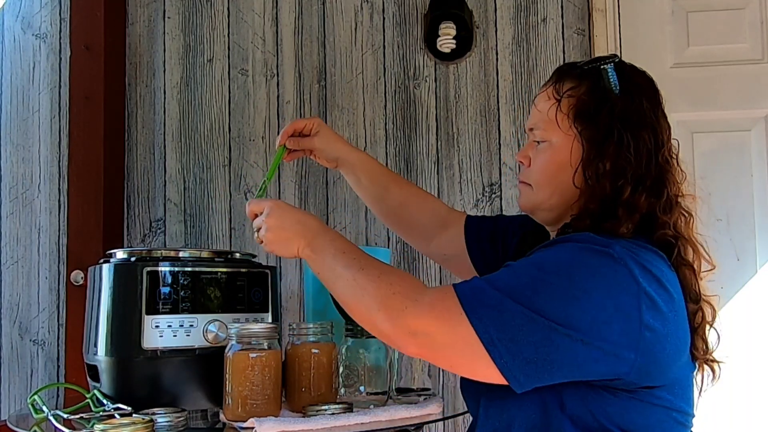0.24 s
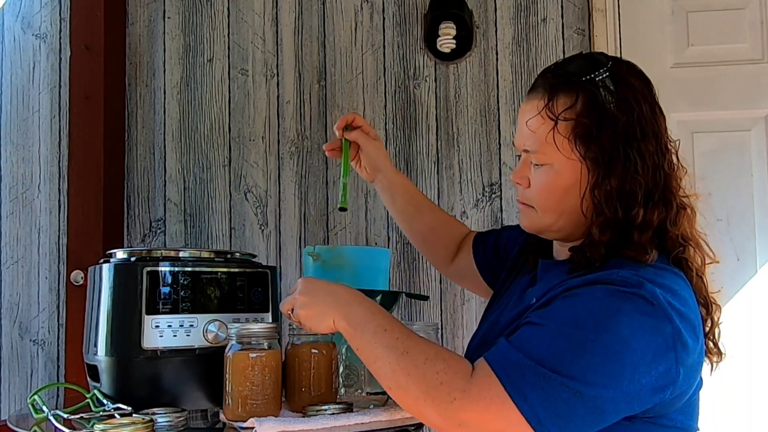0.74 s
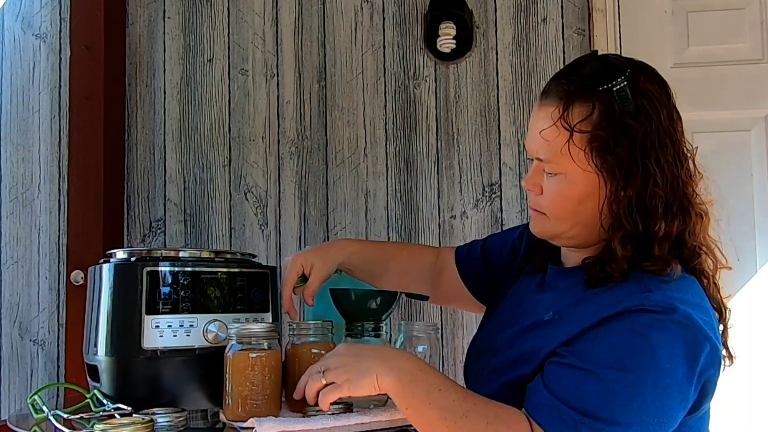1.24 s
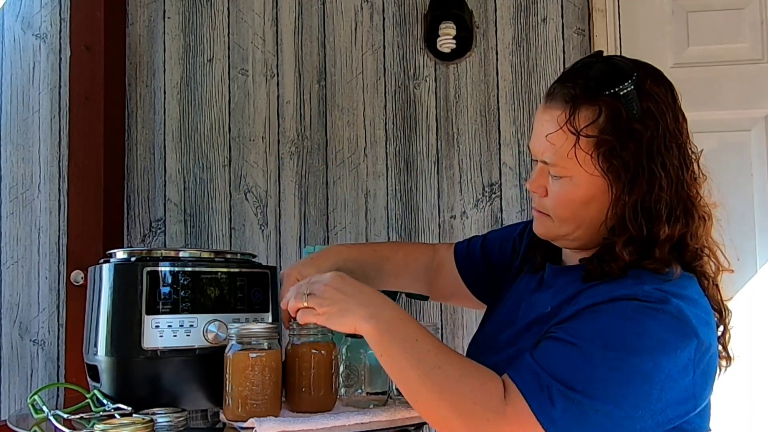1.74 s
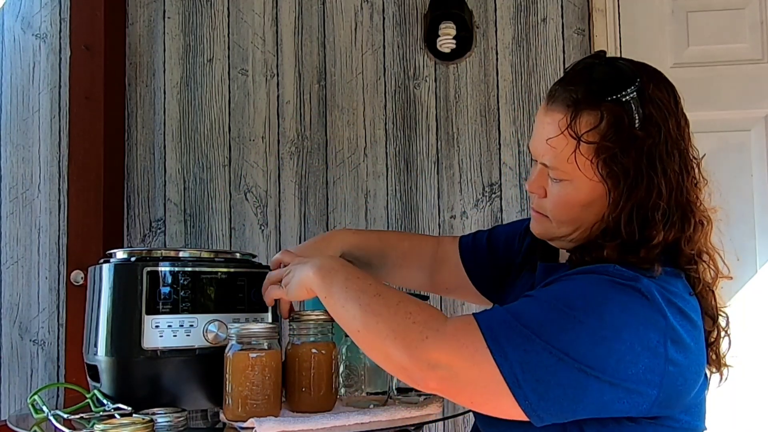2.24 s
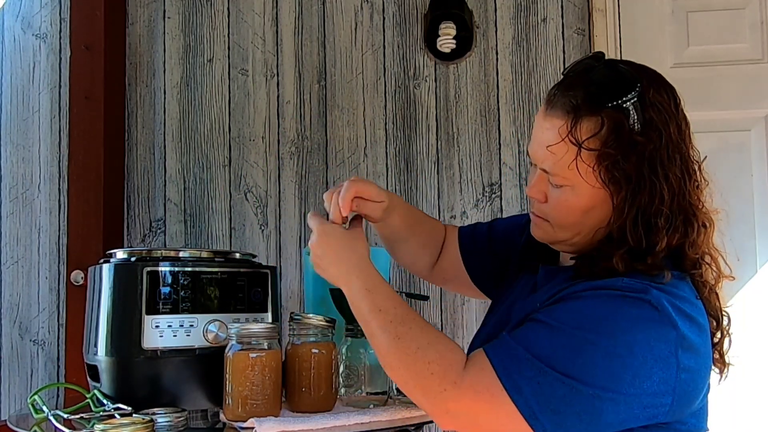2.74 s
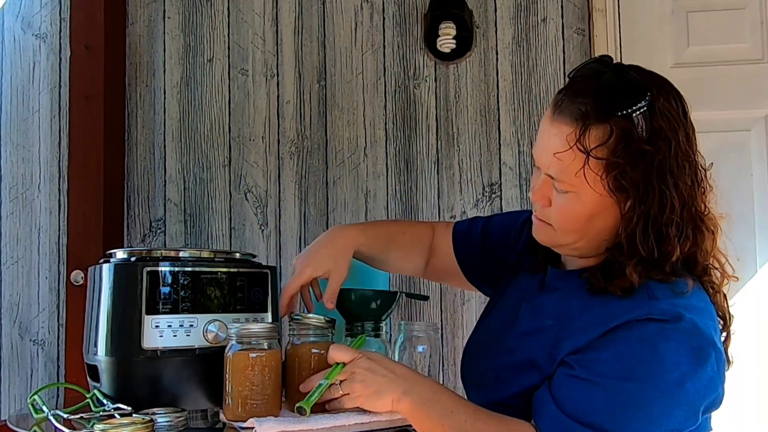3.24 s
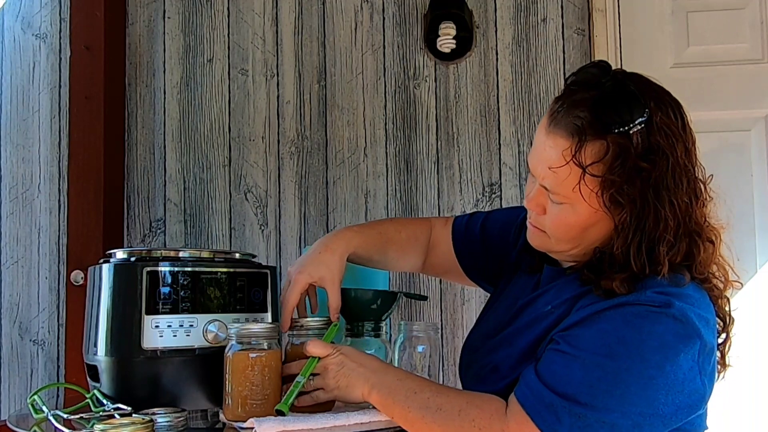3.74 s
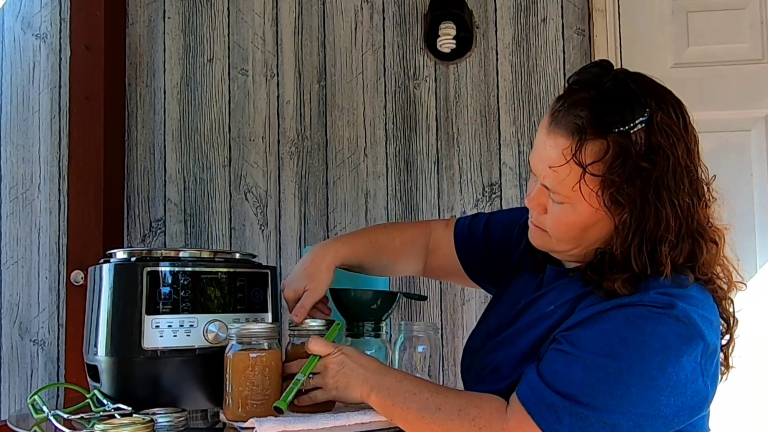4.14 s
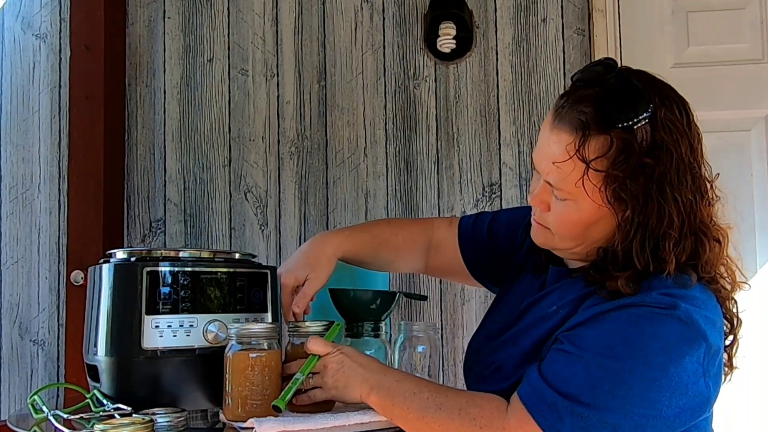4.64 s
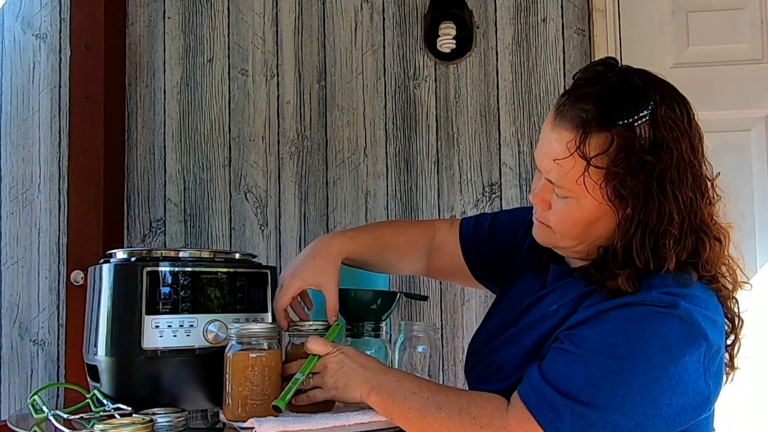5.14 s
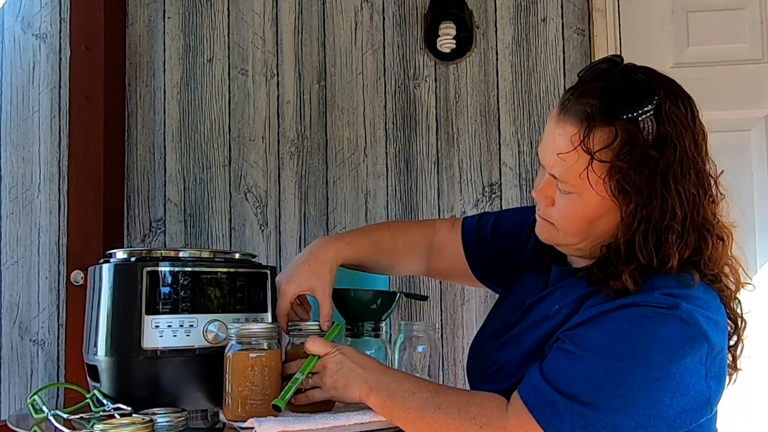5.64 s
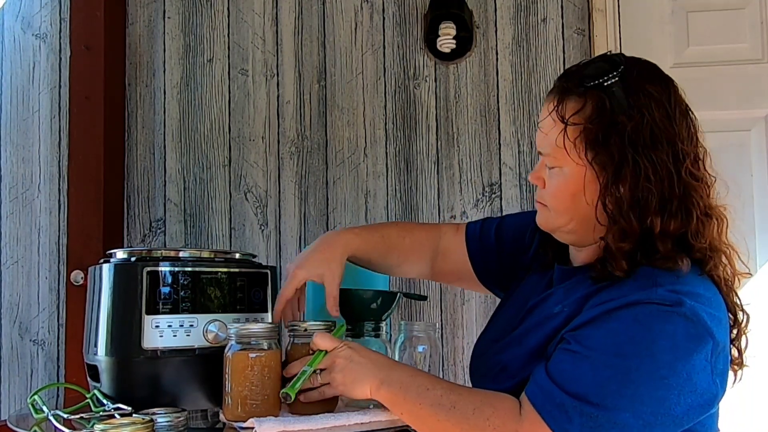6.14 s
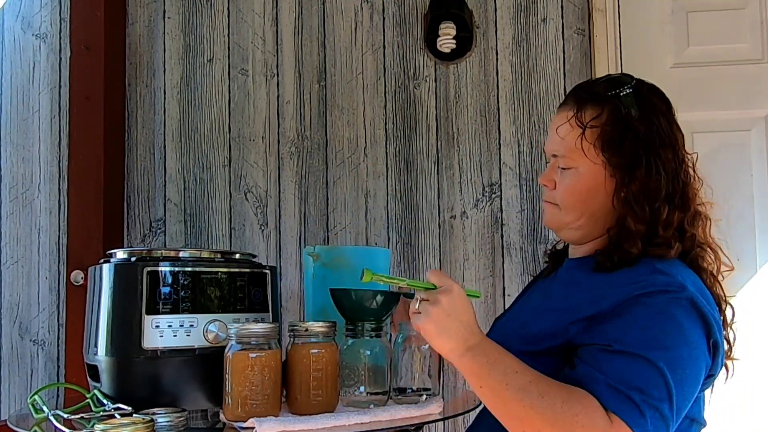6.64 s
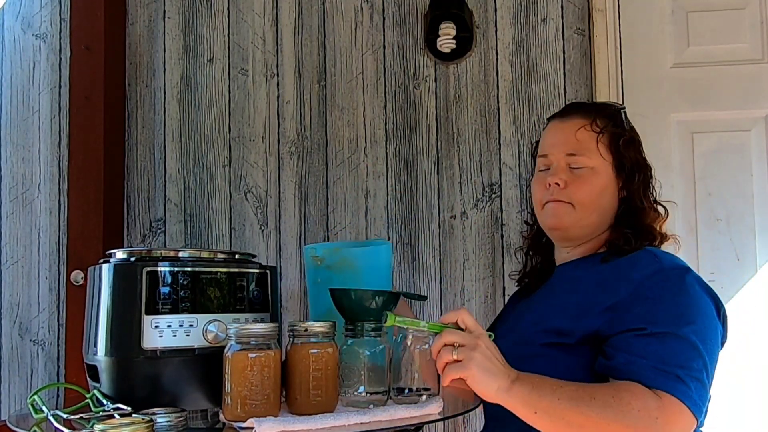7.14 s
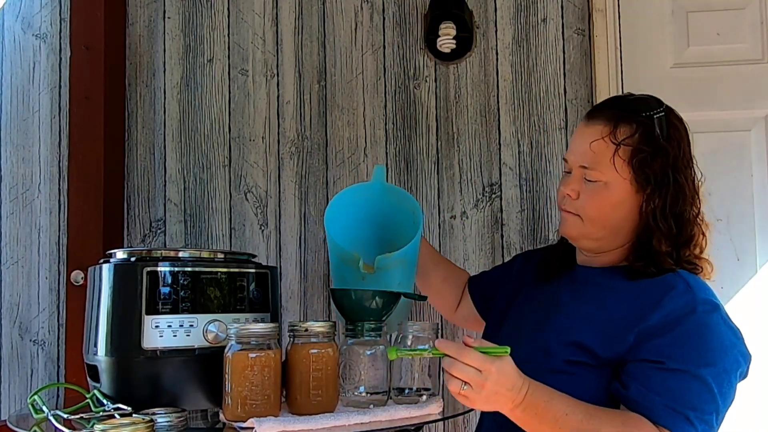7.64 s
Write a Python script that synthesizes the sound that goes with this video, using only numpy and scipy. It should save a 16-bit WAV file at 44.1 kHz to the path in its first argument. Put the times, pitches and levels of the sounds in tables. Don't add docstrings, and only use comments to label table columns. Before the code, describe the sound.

Someone caps glass jars at an outdoor table, heard close. Light plastic taps build to a very loud jar knock, a bird whistling quickly alongside and adding two nasal notes. A lid clanks and bounces with a heavy wooden thud. After a pause, gritty ticking bands twist down, then fade into faint rubbing, light lid touches, insect buzz, wind puffs and renewed whistles.

```python
import sys
import numpy as np
from scipy import signal
from scipy.fft import rfft, irfft, next_fast_len
from scipy.io import wavfile
from scipy.ndimage import uniform_filter1d, map_coordinates

SR = 44100
rng = np.random.default_rng(int(sys.argv[2]) if len(sys.argv) > 2 else 0)


def persist_wave(psi):
    counts = np.round(np.clip(psi, -1, 1) * 32767).astype(np.int16)
    wavfile.write(sys.argv[1], SR, np.atleast_2d(counts).T)


def natural_amplitude(level_db):
    exponent = np.asarray(level_db, float) / 20
    return 10 ** exponent


N = 347949


def rms_one(x):
    return x / np.sqrt(np.mean(x ** 2) + 1e-20)


def at_hz(points, hz):
    return np.interp(np.log(hz + 1), np.log(np.array(points)[:, 0]), np.array(points)[:, 1])


def in_time(rows):
    return np.interp(np.arange(N) / SR, *np.transpose(rows))


def colour(x, spectrum):
    size = next_fast_len(N)
    gain = natural_amplitude(at_hz(spectrum, np.fft.rfftfreq(size, 1 / SR)))
    return irfft(rfft(x, size) * gain, size)[..., :N]


def band(x, low_hz, high_hz):
    return signal.sosfilt(signal.butter(2, [low_hz, high_hz], "band", fs=SR, output="sos"), x)


def highpass(x, hz):
    return signal.sosfilt(signal.butter(2, hz, "high", fs=SR, output="sos"), x)


def drift(rate):
    steps = rng.standard_normal(int(N / SR * 2 * rate) + 3)
    return map_coordinates(steps, [np.arange(N) / SR * 2 * rate], order=3)


def turns(hz):
    return 2 * np.pi * np.cumsum(hz) / SR


def resonate(x, hz, width_hz):
    r = np.exp(-np.pi * width_hz / SR)
    poles = [1, -2 * r * np.cos(2 * np.pi * hz / SR), r * r]
    return signal.lfilter([(1 - r * r) / 2, 0, (r * r - 1) / 2], poles, x)


def place(x, pan_db, lag):
    left = np.interp(np.arange(N) - lag, np.arange(N), x)
    return np.array([left * natural_amplitude(pan_db / 2), x * natural_amplitude(-pan_db / 2)])


def echoes(x, t60, first_s):
    t = np.arange(round(0.5 * SR)) / SR
    tail = rng.standard_normal((2, len(t))) * natural_amplitude(-60 * t / t60) * np.clip(t / first_s, 0, 1)
    tail = tail / np.sqrt(np.sum(tail ** 2, axis=1, keepdims=True))
    return signal.fftconvolve(x[None], tail, axes=1)[:, :N]


def calls(rows):
    rows, t = np.array(rows), np.arange(N) / SR
    row = rows[np.maximum(np.searchsorted(rows[:, 0], t) - 1, 0)].T
    progress = (t - row[0]) / row[1]
    return np.clip(progress, 0, 1), (progress > 0) & (progress < 1), *row[1:]


# f/Hz, level/dB per Hz
CRACK_COLOUR = [(120, -75), (200, -54), (783, 11), (1070, -75), (1260, -23), (2250, -13), (4580, -19.5),
                (10200, -14.5), (15500, -148)]


def knocks(hits, modes, longest_s, pan_db=2.5, push=0.43, bright_db=0.0):
    out, t = np.zeros((2, N)), np.arange(round(0.3 * SR)) / SR
    white = highpass(rng.standard_normal(SR), 0.81 * modes[0][0])
    crack_noise = 0
    for k, (hz, db, _) in enumerate(modes):
        crack_noise = crack_noise + natural_amplitude(0.82 * db) * resonate(white, hz, 344) * (-1) ** k
    crack_noise = rms_one(crack_noise)
    bright = rms_one(colour(white, CRACK_COLOUR)[:SR])
    for s, peak_db, contact_s, crack_db in hits:
        bounces = rng.random(len(t)) < 0.05
        rattle = 0.69 * rng.standard_normal(len(t)) * bounces * np.exp(-(t / contact_s) ** 2)
        rattle[0] = push
        rings = np.zeros(len(t))
        for hz, db, t60 in modes:
            t60 = min(t60, longest_s * (800 / hz) ** 0.14)
            pair = np.sin(2 * np.pi * hz * t) + 0.063 * np.sin(2 * np.pi * 1.3 * hz * t)
            rings += natural_amplitude(db + 2.0 * rng.standard_normal() - 60 * t / t60) * pair
        body = signal.fftconvolve(rattle, rings)[:len(t)]
        i = round(s * SR)
        fresh = slice(i % (SR // 2), i % (SR // 2) + len(t))
        crack = crack_noise[fresh] + natural_amplitude(peak_db + bright_db) * bright[fresh]
        crack = natural_amplitude(crack_db) * crack * np.exp(-t / (0.0029 + 1.08 * contact_s))
        sides = natural_amplitude(pan_db / 2 * np.array([[1], [-1]]))
        out[:, i:i + len(t)] += natural_amplitude(peak_db) * (body / np.abs(body).max() + crack) * sides
    return out


# t/s, level/dB, contact/s, crack/dB
JAR_HITS = [
    (1.024, -1, 0.015, -8),
    (1.062, -48, 0.0087, -17),
]
# f/Hz, level/dB, t60/s
JAR_MODES = [(480, -31, 0.073), (684, -2, 0.12), (800, 13.5, 0.062), (1196, -3, 0.09), (1340, 2.5, 0.07),
             (2685, 7, 0.08), (3086, 9, 0.1), (3570, 2, .1), (4480, 9, 0.07), (4740, -4, .09),
             (1890, -35, .05), (2270, -34, 0.058), (6970, -32, 0.051), (9000, -27, 0.071)]


def jar():
    return knocks(JAR_HITS, JAR_MODES, longest_s=0.069, push=2.3)


# t/s, level/dB, contact/s, crack/dB
JUG_HITS = [
    (.837, -11.5, 0.0096, -5),
    (.85, -37, 0.0087, -19),
]
# f/Hz, level/dB, t60/s
JUG_MODES = [(765, -19, 0.05), (1212, 3.5, 0.14), (1580, 3.5, 0.06), (2500, 1, 0.065), (2800, 8, 0.055),
             (3020, 5.5, 0.06), (3500, -4, 0.045), (3880, 0.5, 0.03), (4880, 2, 0.024)]


def jug():
    return knocks(JUG_HITS, JUG_MODES, longest_s=0.17, pan_db=4.5)


# t/s, level/dB, contact/s, crack/dB
LID_DROPS = [
    (2.29, -12.5, 0.024, -10),
    (2.458, -39, 0.011, 7.5),
]
# t/s, level/dB, contact/s, crack/dB
KNUCKLE_TOUCHES = [
    (7.008, -44, 0.0056, 5.2),
    (7.097, -39.5, 0.009, 4),
    (7.272, -39.5, 0.016, 0.9),
]
# f/Hz, level/dB, t60/s
LID_MODES = [(603, 6.5, 0.059), (820, 7, 0.035), (1226, 3, 0.22), (1560, -15, 0.036), (1700, -10.5, .05),
             (2480, 3.5, 0.037), (2730, 5, 0.044), (3040, 0, 0.05), (3580, -9, .04), (4270, -8, .03),
             (4540, -17, 0.03), (5200, -11, .03), (6260, -12, .03)]


def lids():
    drops = knocks(LID_DROPS, LID_MODES, longest_s=0.27, push=2.2, bright_db=3.5)
    return drops + knocks(KNUCKLE_TOUCHES, LID_MODES, longest_s=0.017)


# t/s, level/dB, contact/s, crack/dB
TABLE_HITS = [
    (2.49, -6, 0.01, -8),
    (2.508, -15, 0.0013, -25),
]
# t/s, level/dB, contact/s, crack/dB
SOFT_BOUNCES = [
    (2.415, -34, 0.0098, -10),
    (2.591, -22, 0.018, -11),
]
# f/Hz, level/dB, t60/s
TABLE_MODES = [(406, 6, 0.057), (475, -1, 0.15), (555, 10, 0.1), (783, 13.5, .12), (1192, 0.5, 0.065),
               (1254, 1, .07), (1927, -9.5, 0.033), (3200, -6.5, .08), (3590, -9, 0.08), (4250, -16, .04),
               (5110, -8.5, 0.06), (1660, -26, .05), (2400, -34, 0.034)]


def table_top():
    blows = knocks(TABLE_HITS, TABLE_MODES, longest_s=0.086, push=1.6, bright_db=-5.0)
    return blows + knocks(SOFT_BOUNCES, TABLE_MODES[:5], longest_s=0.058, bright_db=7)


# t/s, level/dB, contact/s, crack/dB
WAND_HITS = [
    (.385, -22, 0.013, -2.5),
    (.419, -38, 0.0071, -4),
    (1.55, -36, 0.048, -9),
]
# f/Hz, level/dB, t60/s
WAND_MODES = [(1346, 6.9, 0.12), (1720, 1.5, 0.12), (2290, 1.3, 0.1), (2770, 6.5, 0.13), (3200, 0.1, 0.042),
              (4000, 0.097, 0.04), (3820, 1.4, 0.014), (4900, 1.2, 0.059)]


def wand():
    return knocks(WAND_HITS, WAND_MODES, longest_s=0.14)


# t/s, level/dB, contact/s, crack/dB
FUNNEL_HITS = [
    (.912, -28.5, 0.054, -4.5),
    (.953, -12, 0.022, -10),
    (.975, -21, 0.024, -18),
    (1.001, -14.5, 0.02, -13),
]
# f/Hz, level/dB, t60/s
FUNNEL_MODES = [(751, -7.5, 0.09), (1233, 4.5, 0.2), (1340, 5, 0.12), (2100, -8.5, .06),
                (2710, -5.5, 0.055), (3500, -7, 0.055), (3900, -9, 0.042), (4900, -8.5, 0.063)]


def funnel():
    return knocks(FUNNEL_HITS, FUNNEL_MODES, longest_s=0.14, bright_db=-22)


# t/s, level/dB, t60/s
BOOMS = [
    (2.296, -28, 0.55),
    (2.334, -52, 0.18),
    (2.408, -34, 0.083),
    (2.459, -25, 0.092),
    (2.495, -39, 0.29),
    (2.6, -45.5, 0.73),
]


def board():
    t = np.arange(N) / SR
    shudder = rms_one(resonate(band(rng.standard_normal(N), 155, 470), 188, 57))
    swells = sum(np.clip((t - s) / 0.022, 0, 1) * natural_amplitude(db - 60 * np.abs(t - s) / t60) for s, db, t60 in BOOMS)
    return shudder * swells


# f/Hz, width/Hz, level/dB
THREAD_MODES = [(700, 33, 9), (1400, 20, -5), (1840, 54, -5.5), (431, 235, 16), (875, 240, 14.5),
                (1286, 62, 10.5), (1990, 260, 5), (2500, 54, 10.5), (2864, 320, 3.5), (2980, 29, -58),
                (3510, 210, 7.5), (4380, 250, 9), (4650, 23, -23), (4960, 7.3, -12), (5500, 210, -41)]
# f/Hz, level/dB per Hz
RASP_COLOUR = [(88, -57), (150, 14.5), (436, -24), (844, 5), (966, -2.5), (1320, 2), (2410, -25),
               (2980, -5), (9360, -9), (11200, -24), (14200, -47), (15600, -45)]


def scraping():
    low, middle, high = pressure()
    sizes = natural_amplitude(4 * np.minimum(rng.exponential(1, N), 3.5)) * rng.choice([-1, 1], N)
    grit = (rng.random(N) < 5000 / SR) * sizes * natural_amplitude(1.8 * drift(80))
    rings = 0
    for k, (hz, width, db) in enumerate(THREAD_MODES):
        rings = rings + natural_amplitude(db) * resonate(grit, hz, width) * (-1) ** k
    rub = rms_one(colour(grit, RASP_COLOUR)) + 1.1 * rms_one(rings)
    body, rasp = rms_one(band(rub, 166, 780)), rms_one(band(rub, 1190, 3660))
    hiss = rms_one(band(rub, 4450, 6040)) + 0.72 * rms_one(highpass(rub, 6500))
    air = rms_one(band(rng.standard_normal(N), 8100, 17000))
    out = low * body + middle * rasp + high * natural_amplitude(4.5) * hiss + middle * natural_amplitude(-23.5) * air
    return out + ringing(grit) + catches() + metal_ticks()


# peak t/s, rise/s, fall/s, rasp level/dB, brightness/dB
HAND_STROKES = [(1.942, 0.16, 0.2, -57, 13), (3.3, 0.3, 0.51, -53, -0.5), (3.5, 0.23, 0.13, -51, 6.5),
                (3.677, 0.047, 0.062, -31.5, 2), (3.945, 0.037, 0.056, -30.5, 3),
                (4.15, 0.055, 0.22, -33, 2.5), (4.21, 0.11, 0.18, -30.5, 3), (4.27, 0.15, 0.13, -32, 1),
                (4.542, 0.0057, 0.25, -33.5, -1), (4.584, 0.016, 0.12, -28.5, 0),
                (4.64, 0.006, 0.14, -27.5, 2.5), (4.708, 0.0086, 0.11, -29, -1),
                (4.95, 0.0064, 0.076, -39, -3.5), (5.04, 0.14, 0.15, -31.5, 1),
                (5.365, 0.047, 0.12, -38, 0), (5.405, .04, 0.048, -41.5, -1),
                (5.73, 0.082, 0.092, -48.5, 1), (6.0, 0.12, 0.094, -46.5, 4),
                (6.309, 0.096, 0.14, -52.5, 5), (6.071, 0.11, 0.032, -40, 1.5),
                (7.032, 0.3, 0.067, -49.5, 2.5), (7.2, 0.66, 0.46, -53, 2)]


def pressure():
    range_db, rounding = 43.5, 1.86
    body_db, hiss_db = -2, -10.5
    t, gains = np.arange(N) / SR, np.zeros((3, N))
    for s, rise, fall, db, bright_db in HAND_STROKES:
        away = np.maximum((s - t) / rise, (t - s) / fall)
        swell = natural_amplitude(db - range_db * away ** rounding) * np.clip(4 - 4 * away, 0, 1)
        balance = natural_amplitude(np.array([[body_db - bright_db], [0], [hiss_db + bright_db]]))
        gains = np.maximum(gains, swell * balance)
    return gains


# t/s, level/dB, f/Hz, t60/s
AFTER_RINGS = [(3.676, -28, 2020, .05), (3.94, -31.5, 400, 0.079), (4.25, -28, 824, 0.27),
               (4.285, -36, 3590, .08), (4.54, -40, 1390, .06), (4.548, -26.5, 4070, 0.051),
               (4.582, -21, 1340, 0.065), (4.582, -25, 513, .07), (4.586, -25.5, 3086, 0.17),
               (4.59, -36, 5070, 0.035), (4.637, -25, 3220, .05), (4.645, -30, 3800, .05),
               (4.655, -30, 2840, .1), (4.664, -24, 1340, .05), (4.666, -30, 4080, .04),
               (4.705, -25.5, 2856, 0.087), (4.707, -24, 3710, 0.045), (4.712, -24.5, 600, 0.044),
               (4.73, -30, 1384, .06), (4.74, -41, 3060, .25), (4.949, -29, 1680, 0.044),
               (5.027, -22.5, 2500, 0.044), (5.053, -30, 3500, .03), (5.075, -41, 2940, .04)]
# peak t/s, length/s, f/Hz, width/Hz, level/dB
GAP_HUMS = [(5.01, 0.037, 1600, 140, -36.5), (5.042, 0.046, 1900, 250, -34), (5.057, 0.038, 2100, 230, -50),
            (4.26, 0.16, 785, 39, -40), (7.125, 0.076, 420, 95, -43.5), (3.97, 0.067, 490, 170, -36.5),
            (4.7, .015, 3900, 900, -38.5), (4.612, 0.038, 3300, 450, -48), (4.645, 0.034, 410, 150, -33.5)]


def ringing(grit):
    out, t = np.zeros(N), np.arange(round(0.3 * SR)) / SR
    for s, db, hz, t60 in AFTER_RINGS:
        ring = natural_amplitude(db - 60 * t / t60) * np.clip(t / 0.0012, 0, 1) * np.sin(2 * np.pi * hz * t)
        out[round(s * SR):round(s * SR) + len(t)] += ring
    now = np.arange(N) / SR
    for s, length, hz, width, db in GAP_HUMS:
        out += natural_amplitude(db) * np.exp(-((now - s) / length * 2) ** 2) * rms_one(resonate(grit, hz, width))
    return out * natural_amplitude(2.7 * drift(100))


# t/s, level/dB, f/Hz
THREAD_CATCHES = [(3.674, -25, 790), (3.934, -27, 1990), (3.952, -20, 1280), (4.221, -21, 697),
                  (4.246, -17.5, 834), (4.549, -20, 934), (4.584, -19, 3150), (4.637, -16.5, 431),
                  (4.668, -22, 1290), (4.707, -25, 2850), (4.948, -30, 336), (5.027, -27, 1850),
                  (5.052, -22, 2020), (5.695, -33.5, 726), (5.705, -35, 752), (4.13, -44, 3390),
                  (4.198, -15, 5760), (4.228, -21.5, 852), (4.28, -26.5, 734), (4.54, -26, 1380),
                  (4.599, -20, 1090), (4.655, -22, 512), (4.731, -29, 800), (4.996, -27, 1490),
                  (5.065, -35, 1740), (5.078, -35, 2400), (5.364, -33, 740), (5.4, -34, 700)]


def catches():
    out, t = np.zeros(N), np.arange(2000) / SR
    for s, db, hz in THREAD_CATCHES:
        tick = 0.5 * rng.standard_normal(len(t)) * np.exp(-t / 0.0009)
        ring = np.sin(2 * np.pi * hz * t) * np.exp(-t / 0.008 * (hz / 800) ** 0.9)
        out[round(s * SR):round(s * SR) + len(t)] += natural_amplitude(db - 1.0) * band(tick + ring, 130, 6600)
    return out


# t/s, level/dB
METAL_TICKS = [(3.678, -9), (3.935, -9), (4.1984, -30), (4.583, -21), (4.6015, -28), (4.551, -30),
               (4.637, -16), (4.706, -18), (4.948, -33), (4.731, -27), (5.029, -26), (5.057, -18),
               (7.0994, -46)]


def metal_ticks():
    out, t = np.zeros(N), np.arange(2000) / SR
    for s, db in METAL_TICKS:
        burst = band(rng.standard_normal(len(t)) * np.exp(-t / 0.0021), 1700, 9300)
        out[round(s * SR):round(s * SR) + len(t)] += natural_amplitude(db - 13.0) * burst
    return out


# t/s, length/s, top f/Hz, last f/Hz, level/dB
BIRD_WHISTLES = [(0.359, 0.11, 9190, 7600, -39), (0.524, 0.073, 7540, 5900, -30),
                 (0.641, 0.054, 7210, 5500, -26.5), (0.741, 0.049, 7050, 4900, -27),
                 (0.826, 0.041, 6980, 5100, -25.5), (0.917, 0.047, 6600, 5440, -25.5),
                 (7.345, 0.1, 9290, 6100, -36.5), (7.49, .012, 7050, 6900, -51),
                 (7.5, 0.077, 7400, 5700, -25.5), (7.621, 0.049, 7180, 5400, -26),
                 (7.714, 0.041, 6840, 5070, -24), (7.801, 0.038, 6830, 5800, -26)]


def whistles():
    from_hz, rise_s, plain_hz = 3720, 0.012, 6900
    sag, sharpness = 6500, 6.5
    out, waver = np.zeros(N + SR), np.pad(drift(70), (0, SR))
    for s, length, top_hz, last_hz, db in BIRD_WHISTLES:
        i, t = round(s * SR), np.arange(round(length * SR)) / SR
        growth_db = (3.0 + 5 * (top_hz - plain_hz) / 1000) * t / length
        unrisen = np.clip(1 - t / rise_s / (top_hz / plain_hz) ** 0.8, 0, 1) ** 1.8
        hz = top_hz - (top_hz - from_hz) * unrisen - sag * t
        hz -= (top_hz - sag * length - last_hz) * (t / length) ** sharpness
        phase = turns(hz * (1 + 0.0072 * waver[i:i + len(t)]))
        swell = np.clip(t / 0.0075, 0, 1) ** 0.68 * np.clip((length - t) / (0.17 * length), 0, 1)
        mirror = natural_amplitude(-8 - growth_db) * np.sin(2 * np.pi * 24000 * t - phase) * (hz > 8400)
        octave = natural_amplitude(-11) * np.sin(2 * phase) * (hz < 4800)
        out[i:i + len(t)] += natural_amplitude(db + 5.0 + growth_db) * swell * (np.sin(phase) + mirror + octave)
    return out[:N] * natural_amplitude(0.84 * drift(70))


# t/s, length/s, upper voice f/Hz, lower voice f/Hz, level/dB
NASAL_CALLS = [
    (1.09, .12, 2227, 1885, -35.5),
    (1.23, 0.14, 2197, 1807, -37),
]
VOICE_MIXES = [(1, 0), (0, 1), (-1, 3), (0, 2), (1, 1), (2, 0), (3, -1), (0, 3), (1, 2), (2, 1), (4, -2),
               (5, -3), (-2, 4)]
VOICE_MIX_LEVELS = [-15, -22, -10.5, -3, -4.5, -1, -15, -28, -20, -28, -16, -15, -21]


def nasal_notes():
    progress, sounds, length, upper, lower, db = calls(NASAL_CALLS)
    arch = 1 - 0.064 * (2 * progress - 1) ** 2
    edge_s = np.minimum(progress, 1 - progress) * length
    db = db - 8.5 * np.clip(1 - edge_s / 0.031, 0, 1)
    a, b = [turns(f * arch * (1 + 0.009 * drift(90))) for f in (upper, lower)]
    hoarse = 1 + 0.4 * drift(350)
    stack = 0
    for (m, n), level in zip(VOICE_MIXES, VOICE_MIX_LEVELS):
        stack = stack + natural_amplitude(level + 2.1 * drift(25.13)) * np.sin(m * a + n * b)
    return uniform_filter1d(1.0 * sounds, size=256) * hoarse * natural_amplitude(db + 3.0) * stack


def far_bird(rows, hoarse, fade_db=-2.5, arch=0.0):
    progress, sounds, length, first_hz, last_hz, db = calls(rows)
    hz = (first_hz + (last_hz - first_hz) * progress) * (1 + arch * np.sin(np.pi * progress ** 0.77))
    gate = np.clip(progress / 0.082, 0, 1) * np.clip((1 - progress) / 0.12, 0, 1)
    blur = 0.94 + 0.5 * drift(hoarse * 12000)
    level = natural_amplitude(db + 2.5 - fade_db * np.abs(2 * progress - 0.9) + drift(22))
    return gate * level * blur * np.sin(turns(hz * (1 + hoarse * drift(80))))


# t/s, length/s, first f/Hz, last f/Hz, level/dB
LOW_GLIDES = [(2.54, 0.52, 3450, 3070, -56.5), (6.39, 0.57, 3274, 2950, -53.5)]
HIGH_GLIDES = [(6.36, .54, 7030, 6630, -52)]
TOP_GLIDES = [(6.3, .37, 8020, 7250, -55.5), (6.68, 0.18, 7780, 7950, -53.5)]
SHORT_GLIDES = [(2.93, 0.16, 2790, 2740, -61), (3.12, .2, 2650, 2150, -62), (4.76, 0.14, 3150, 3050, -59),
                (5.3, 0.16, 2730, 2740, -61), (6.28, .07, 3500, 3450, -62)]


def far_birds():
    low = far_bird(LOW_GLIDES, hoarse=0.02, fade_db=6.5, arch=0.04)
    high = far_bird(HIGH_GLIDES, hoarse=0.035) + far_bird(TOP_GLIDES, hoarse=0.014)
    return low + high + far_bird(SHORT_GLIDES, hoarse=0.0093)


# last pulse t/s, level/dB
CRICKET_CHIRPS = [(0.144, -59), (1.65, -64), (1.982, -59.5), (3.0, -63), (3.5, -62), (4.87, -59.5),
                  (5.375, -63), (5.7, -60.5), (6.19, -60), (6.59, -58.5), (6.934, -57), (7.28, -57.5),
                  (7.649, -57.5), (7.97, -49)]


def cricket():
    out, t = np.zeros(N + SR), np.arange(round(0.04 * SR)) / SR
    for s, db in CRICKET_CHIRPS:
        for k, hz in enumerate((4660, 4620, 4520)):
            i = round((s - 0.02 - 0.039 * k) * SR)
            stroke = np.hanning(len(t)) ** 0.6 * np.sin(2 * np.pi * hz * t)
            out[i:i + len(t)] += natural_amplitude(db + 4 - 1.5 * k) * stroke
    return out[:N] * natural_amplitude(3.3 * drift(90)) * (1 + 0.34 * drift(400))


# t/s, level/dB
BUZZ_LEVEL = [(0.0, -57), (0.5, -50.5), (1.1, -58), (2.35, -55.5), (2.55, -57), (4.5, -52.5), (4.8, -57),
              (6.35, -53), (6.9, -55), (7.274, -57), (7.45, -49)]
# f/Hz, width/Hz, level/dB
INSECT_DRONES = [(7900, 63, -63.5), (7410, 1380, -50), (7896, 650, -48)]


def insects():
    depth = np.clip(0.15 + 0.23 * drift(4.4), 0, 1)
    throb = 1 + depth * np.sin(turns(33 * (1 + 0.0084 * drift(1.0))))
    buzz = rms_one(resonate(rng.standard_normal((2, N)), 6435, 85))
    out = natural_amplitude(in_time(BUZZ_LEVEL) + 2.5 + 0.58 * drift(2.5)) * throb * buzz
    for hz, width, db in INSECT_DRONES:
        noise = resonate(resonate(rng.standard_normal((2, N)), hz, width), hz, width)
        out += natural_amplitude(db + drift(2.9)) * rms_one(noise)
    return out


# f/Hz, level/dB per Hz
YARD_COLOUR = [(15, -40), (25, -7.5), (54, -8), (95, -12), (210, 1.5), (337, -7.5), (520, -12), (760, -2.5),
               (1030, -8.5), (1220, -6), (3210, -10), (3450, -9), (3910, -14), (7820, -22), (8700, -19.5),
               (9500, -26.5), (12100, -55), (20500, -120)]
# t/s, level/dB
YARD_SWELL = [(0.0, -48), (0.88, -49), (0.99, -48.5), (1.34, -50), (7.45, -47.5), (7.89, -51)]
# f/Hz, likeness (-1 to 1)
SIDE_LIKENESS = [(60, -0.13), (150, 0.23), (380, -0.019), (950, -0.51), (2380, 0.29), (5980, 0.4),
                 (15000, -0.05)]


def yard():
    size = next_fast_len(N)
    hz = np.fft.rfftfreq(size, 1 / SR)
    mid, side = rfft(rng.standard_normal((2, size))) * natural_amplitude(at_hz(YARD_COLOUR, hz))
    alike = np.clip(at_hz(SIDE_LIKENESS, hz), -0.95, 0.95)
    noise = irfft(np.sqrt(1 + alike) * mid + np.sqrt(1 - alike) * side * [[1], [-1]], size)[:, :N]
    noise = noise * natural_amplitude(0.6 * drift(4))
    noise = noise / np.std(band(noise.mean(axis=0), 870, 2690))
    return natural_amplitude(in_time(YARD_SWELL)) * noise * natural_amplitude(np.array([[0.8], [-0.8]]))


# peak t/s, length/s, level/dB
WIND_PUFFS = [(4.103, 0.22, -56), (4.65, 0.069, -38.5), (4.76, 0.074, -38), (4.852, 0.13, -52),
              (5.54, 0.04, -42), (6.097, 0.41, -58), (6.926, 0.08, -36), (7.12, 0.09, -40),
              (7.248, 0.2, -52)]


def wind():
    t, white = np.arange(N) / SR, rng.standard_normal((2, N))
    puffs = rms_one(band(white - 0.31 * white[::-1], 18, 53.6))
    swells = sum(np.exp(-((t - s) / length * 2) ** 2) * natural_amplitude(db) for s, length, db in WIND_PUFFS)
    return puffs * swells * natural_amplitude(-8 / 2 * np.array([[1], [-1]]))


def scene():
    table = jar() + jug() + lids() + table_top() + wand() + funnel()
    table = signal.sosfilt(signal.butter(1, 9000, fs=SR, output="sos"), table)
    table = table + place(scraping(), pan_db=2.0, lag=0.93)
    table = table - 0.75 * resonate(table, 970, 210)
    table = highpass(table, 280)
    porch = natural_amplitude(-3.5) * echoes(table.mean(axis=0), t60=0.17, first_s=0.0023)
    near = whistles() + nasal_notes()
    far = far_birds() + cricket()
    trees = natural_amplitude(-2.5) * echoes(band(near, 2200, 9000), t60=0.21, first_s=0.0037)
    trees += natural_amplitude(7) * echoes(far, t60=0.38, first_s=0.0078)
    distant = place(far, pan_db=-9.0, lag=0.65) * 1.73 + insects() + yard()
    distant = signal.sosfilt(signal.cheby2(5, 35, 11000, fs=SR, output="sos"), distant)
    return table + porch + board() + place(near, pan_db=-4.0, lag=1.7) + trees + distant + wind()


def roll_off(x):
    return signal.sosfilt(signal.butter(12, 15820, fs=SR, output="sos"), x)


def record(dry):
    hiss = natural_amplitude(-85) * rms_one(band(rng.standard_normal(dry.shape), 13700, 14900))
    overloaded = np.clip(dry + hiss, -1, 1)
    mix = signal.sosfilt(signal.cheby2(8, 40, 15700, fs=SR, output="sos"), overloaded)
    return roll_off(mix)


dry = scene()
out = record(dry)
persist_wave(out)
```